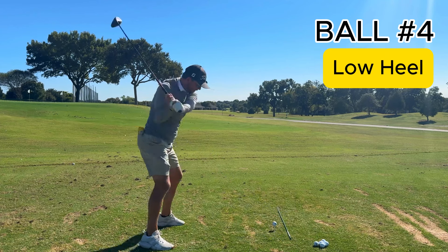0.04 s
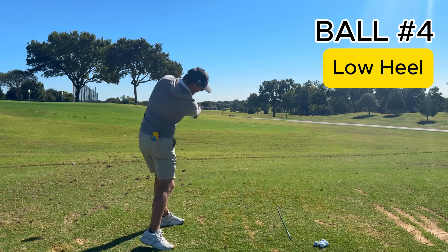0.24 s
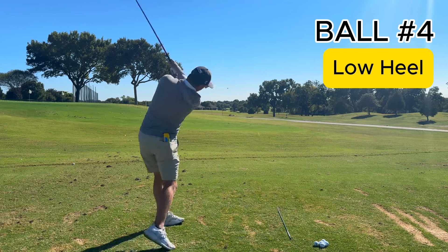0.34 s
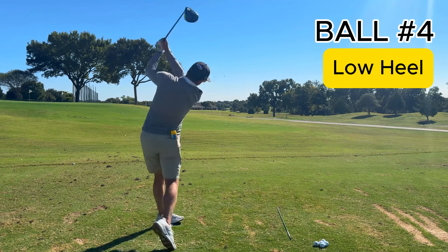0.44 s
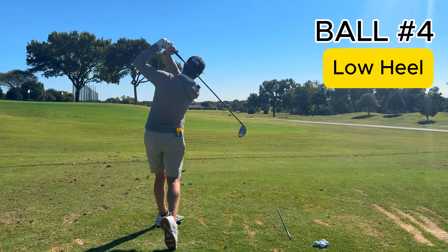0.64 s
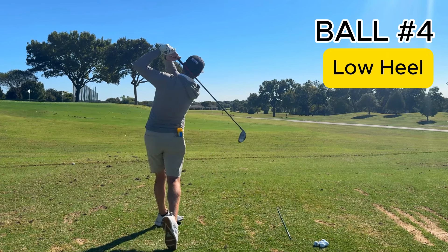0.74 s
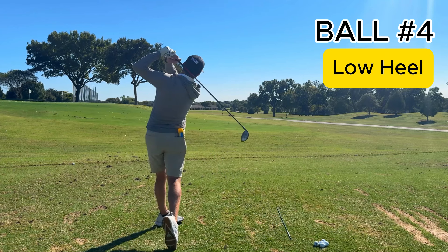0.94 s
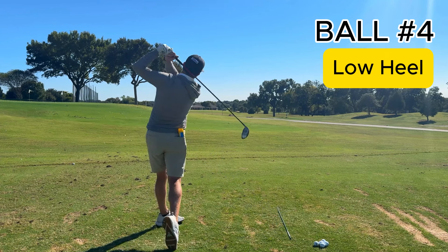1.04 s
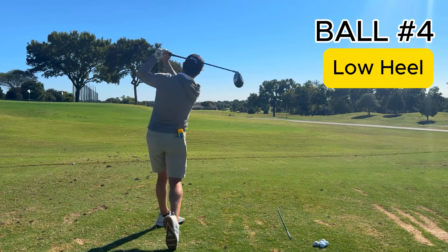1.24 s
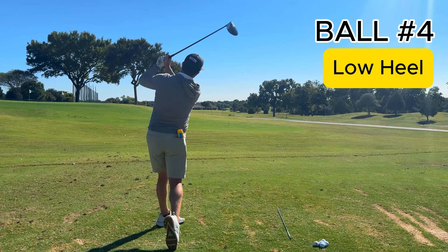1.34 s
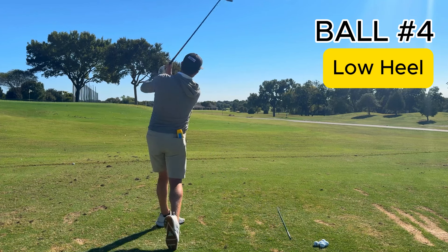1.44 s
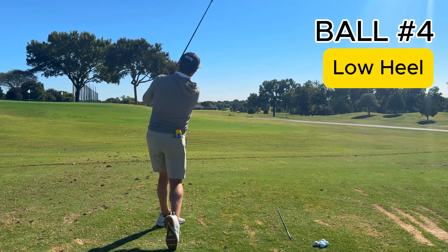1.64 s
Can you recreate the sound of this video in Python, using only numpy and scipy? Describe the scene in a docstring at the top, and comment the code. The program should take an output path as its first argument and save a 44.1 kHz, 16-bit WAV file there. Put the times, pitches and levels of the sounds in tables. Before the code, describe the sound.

One bright, metallic crack sounds close by as a golf club swishes down and hits a ball on an open grass range. Afterwards clothes rustle softly and a shoe ticks faintly over a low, distant traffic rumble.

```python
"""A quick swish and a sharp crack: a golf club hits a ball off its tee on an open practice range.
The club's hollow metal head rings briefly, the ball and shaft knock, and the sound scatters off the grass.
The swish is air swirling behind the club; a lower rush follows as the club swings on.
Shoes and clothes rustle faintly over far traffic, a low engine hum and a motor that comes and goes."""
import sys
import numpy as np
from scipy import signal
from scipy.fft import rfft, irfft
from scipy.io import wavfile

SR = 44100
rng = np.random.default_rng(int(sys.argv[2]) if len(sys.argv) > 2 else 0)


def transcribe(u):
    """Save the signal u as a 16-bit wav file named by the first command-line argument.

    u: samples, shape (n,) or (channels, n), limited to [-1, 1]; the rate is SR.
    q: integer samples, one column per channel.
    """
    v = np.clip(np.atleast_2d(u).T, -1, 1)
    q = np.round(v * 32767).astype(np.int16)
    wavfile.write(sys.argv[1], SR, q)


N = 74970
T = np.arange(N) / SR   # the time of each sample, in seconds

# The club brushes the tee, hits the ball, and a second crack follows. A fade is the time to drop 60 dB.
# Columns: start_s, ring_db, crack_db, crack_fade_s, knock_db
CONTACTS = [(0.2104, -19, -26, .03, -4), (0.213, 1.5, -9, .04, 1), (0.2207, -8, -8.5, .01, 0.5)]
HIT_S = CONTACTS[1][0]   # when the club meets the ball

def club_hit():
    """Each contact makes a ring, a crack and a knock. The ring flutters, except right at the hit."""
    flutter = 1 + .23 * wander(rate_hz=120) * (1 - swell(HIT_S, width_s=.013))
    sound = np.zeros(N)
    for start_s, ring_db, crack_db, crack_fade_s, knock_db in CONTACTS:
        sound += from_db(ring_db) * head_ring(start_s) * flutter
        sound += from_db(crack_db) * crack(start_s, crack_fade_s)
        sound += from_db(knock_db) * knock(start_s)
    return sound


# The natural tones of the club's head. Columns: pitch_hz, level_db, fade_s
HEAD_TONES = [(1990, -35.5, .11), (2119, -45, .24), (3260, -29.5, 0.065), (3670, -30.5, .1),
              (3960, -11, .028), (4506, -22.5, .06), (4627, -9, .034), (4988, -14, 0.061),
              (5389, -10, 0.047), (5790, -15, 0.037), (6130, -12, .03), (6430, -17, 0.06),
              (7070, -19.5, .052), (8423, -23, 0.016), (9340, -27, 0.03), (10098, -25, .04)]

def head_ring(start_s):
    """The hollow metal head vibrates at many pitches at once when struck."""
    return struck(HEAD_TONES, start_s, rise_s=.0002)


# The crack's colour: how strong it is from low to high. Columns: pitch_hz, level_db
CRACK_COLOUR = [(150, -26.5), (400, -16), (1000, -8), (2300, -8), (4000, 0), (6000, -0.5), (8500, -5.5),
                (12000, -12.5), (15500, -17)]

def crack(start_s, fade_s):
    """A sudden contact gives a very short burst of bright noise."""
    return noise(CRACK_COLOUR) * burst(start_s, rise_s=.00016, fade_s=fade_s)


# The dull tones of the ball and shaft. Columns: pitch_hz, level_db, fade_s
KNOCK_TONES = [(125, -37, .022), (422.4, -20.5, .017), (890, -20.5, .013), (1100, -19.5, .014),
               (1316, -17, .016), (1799.3, -26, 0.0087), (2615, -21, 0.013)]

def knock(start_s):
    """The ball and shaft vibrate so briefly that they sound like a knock."""
    return struck(KNOCK_TONES, start_s, rise_s=.0001)


# The colour of the scattered sound. Columns: pitch_hz, level_db
SCATTER_COLOUR = [(200, -16.5), (1000, -17), (2400, -13), (3600, -1), (5000, -0.5), (7000, -3.5),
                  (10000, -12.5), (15500, -24)]

def scatter_and_echo(hit):
    """The hit scatters off the grass nearby and from farther away, and returns as one faint, dull echo."""
    near = from_db(-24.5) * burst(HIT_S, rise_s=.004, fade_s=.07)
    far = from_db(-53) * burst(HIT_S, rise_s=.015, fade_s=.41)
    delay_s = .057
    delayed_hit = np.interp(T - delay_s, T, hit, left=0)
    echo = from_db(-37) * low_pass(delayed_hit, cutoff_hz=4440)
    return (near + far) * noise(SCATTER_COLOUR) + echo


# The colour of air rushing past the club. Columns: pitch_hz, level_db
AIR_COLOUR = [(40, -15), (150, -4), (400, -2), (1000, -3), (1600, -8.5), (3000, -13.5), (6000, -15.5),
              (10000, -24), (15500, -38.5)]

def downswing():
    """The club sheds swirls of air, which sound louder and higher the faster it moves."""
    peak_s, rise_db_per_s, fall_db_per_s = .2, 401, 901
    swing_db = np.minimum(rise_db_per_s * (T - peak_s), fall_db_per_s * (peak_s - T))
    pitch_hz = 760 * 2 ** (swing_db / 37.5)   # one octave lower for every 37.5 dB quieter
    swirls = pitched_noise(pitch_hz, width_hz=350)
    rush = from_db(-7) * noise(AIR_COLOUR)
    return from_db(-35 + swing_db) * (swirls + rush)


# The colour of the lower rush after the hit. Columns: pitch_hz, level_db
FOLLOW_THROUGH_COLOUR = [(40, -22), (100, -14), (200, -8.5), (320, 0), (500, -7), (800, -18), (1200, -13),
                         (2000, -22), (6000, -30), (15500, -55)]

def follow_through():
    """The club swings on through the air with a short, soft rush."""
    return from_db(-51) * swell(.269, width_s=.015) * noise(FOLLOW_THROUGH_COLOUR)


# Each rub of a shoe or of cloth. Columns: peak_s, width_s, level_db
RUBS = [(0.005, 0.061, -67), (0.035, .011, -61), (0.116, .004, -68.5), (0.41, .04, -76), (0.48, .015, -73),
        (0.63, 0.05, -77.5), (0.76, .09, -81)]
# The colour of that rubbing. Columns: pitch_hz, level_db
RUB_COLOUR = [(200, 3), (1000, -2), (2000, -3.5), (3200, -2), (5200, -2.5), (7500, -7), (10000, -13),
              (15500, -30.5)]

def rustle():
    """Shoes and clothes rub softly as the golfer turns."""
    power = sum((from_db(level_db) * swell(peak_s, width_s)) ** 2 for peak_s, width_s, level_db in RUBS)
    return np.sqrt(power) * noise(RUB_COLOUR)


# The small ticks of a shoe. Columns: start_s, level_db
SHOE_TICKS = [(1.045, -71), (1.054, -60), (1.065, -66)]
# The tones in one tick. Columns: pitch_hz, level_db, fade_s
TICK_TONES = [(290, -0.5, 0.034), (520, -7, .02), (2100, -9.5, .012), (4900, -6, 0.013), (5300, -10, .01),
              (6570, -14, .008)]

def shoe_ticks():
    """A shoe settles with crisp ticks, each a few short tones and a little gritty rubbing."""
    grit = from_db(-12) * noise(RUB_COLOUR)
    sound = np.zeros(N)
    for start_s, level_db in SHOE_TICKS:
        tones = struck(TICK_TONES, start_s, rise_s=.0004)
        scrape = grit * burst(start_s, rise_s=.00016, fade_s=.011)
        sound += from_db(level_db) * (tones + scrape)
    return sound


# The colour of far traffic and breeze. Columns: pitch_hz, level_db
TRAFFIC_COLOUR = [(20, -3), (55, -3), (85, -2.5), (115, -1.5), (170, -13), (300, -17), (450, -18),
                  (750, -17), (1050, -22), (1400, -29), (2000, -36), (3000, -36.5), (5500, -41),
                  (9000, -47.5), (15500, -60.5)]

def far_traffic():
    """Far traffic and breeze blend into a steady, low rumble."""
    return from_db(-63) * noise(TRAFFIC_COLOUR)


def engine_hum():
    """An engine hums on one low note that wavers a little."""
    pitch_hz = 87.2 + 2.7 * wander(rate_hz=9)
    tone = np.sqrt(2) * np.sin(2 * np.pi * np.cumsum(pitch_hz) / SR)
    return from_db(-70) * tone


# The tones of a far motor. Columns: pitch_hz, level_db
MOTOR_TONES = [(297, -77), (371, -80.5), (445, -81.5), (593, -81), (667, -78.5), (742, -78)]

def far_motor():
    """A far motor's drone swells and fades away."""
    drone = sum(from_db(db) * pitched_noise(hz, width_hz=6) for hz, db in MOTOR_TONES)
    return swell(.58, width_s=.18) * drone


def from_db(db):
    """Turn decibels into a number to multiply a sound by."""
    return 10 ** (np.asarray(db) / 20)


def unit_level(sound):
    """Scale a sound so that its average level (rms) is 1."""
    return sound / np.sqrt(np.mean(sound ** 2) + 1e-20)


def low_pass(sound, cutoff_hz):
    """Dull a sound by turning down what lies above the cutoff."""
    return signal.sosfilt(signal.butter(2, cutoff_hz, fs=SR, output="sos"), sound)


def wander(rate_hz):
    """A smooth random wobble at level 1."""
    return unit_level(low_pass(rng.standard_normal(2 * N), rate_hz)[N:])


def noise(colour):
    """Steady noise at level 1; the colour table sets only the balance of low and high."""
    pitch_hz, level_db = np.transpose(colour)
    all_hz = np.maximum(np.arange(N // 2 + 1) * SR / N, 1)
    gains = from_db(np.interp(np.log(all_hz), np.log(pitch_hz), level_db))
    return unit_level(irfft(rfft(rng.standard_normal(N)) * gains, N))


def pitched_noise(pitch_hz, width_hz):
    """Noise at level 1, gathered around one pitch that may slide."""
    phase = 2 * np.pi * np.cumsum(pitch_hz * np.ones(N)) / SR
    return unit_level(wander(width_hz / 2) * np.cos(phase) + wander(width_hz / 2) * np.sin(phase))


def burst(start_s, rise_s, fade_s):
    """A loudness curve that rises quickly, then drops 60 dB every fade_s."""
    age_s = np.maximum(T - start_s, 0)
    return (1 - np.exp(-age_s / rise_s)) * np.exp(-np.log(1000) * age_s / fade_s)


def swell(peak_s, width_s):
    """A loudness curve shaped like a bell."""
    return np.exp(-.5 * ((T - peak_s) / width_s) ** 2)


def struck(tones, start_s, rise_s):
    """One blow starts all the tones together, and each fades at its own speed."""
    sound = np.zeros(N)
    for k, (pitch_hz, level_db, fade_s) in enumerate(tones):
        wave = (-1) ** k * np.cos(2 * np.pi * pitch_hz * (T - start_s))   # every other tone is flipped
        sound += from_db(level_db) * wave * burst(start_s, rise_s, fade_s)
    return sound


def scene():
    """Add the shot, the golfer and the background into one channel."""
    hit = club_hit()
    shot = hit + scatter_and_echo(hit) + downswing() + follow_through()
    golfer = rustle() + shoe_ticks()
    background = far_traffic() + engine_hum() + far_motor()
    return (shot + golfer + background)[None]


def record(dry):
    """Round off the crack's peaks and cut the very highest treble."""
    ceiling, cutoff_hz = .75, 15750
    rounded = ceiling * np.tanh(dry / ceiling)
    return signal.sosfilt(signal.ellip(10, .2, 75, cutoff_hz, fs=SR, output="sos"), rounded)


dry = scene()
out = record(dry)
transcribe(out)
```